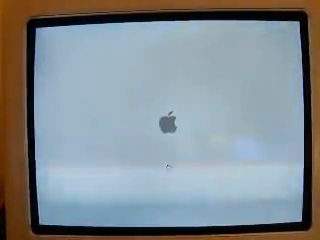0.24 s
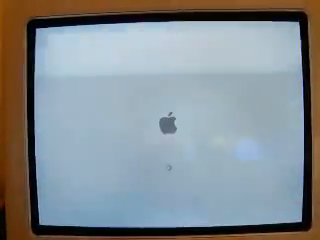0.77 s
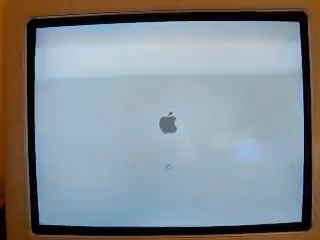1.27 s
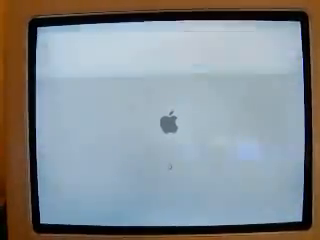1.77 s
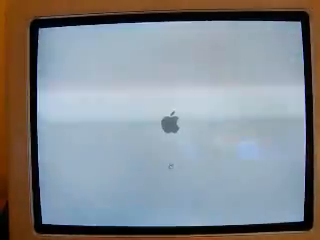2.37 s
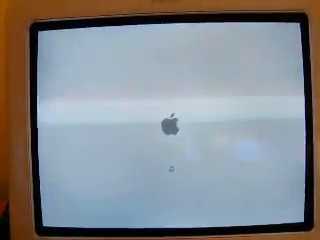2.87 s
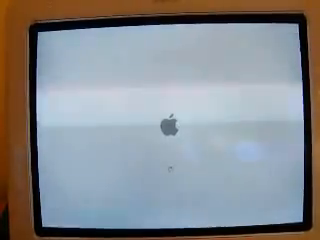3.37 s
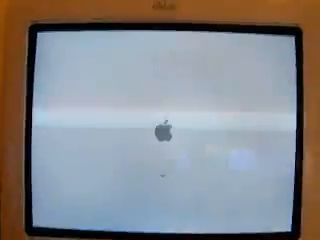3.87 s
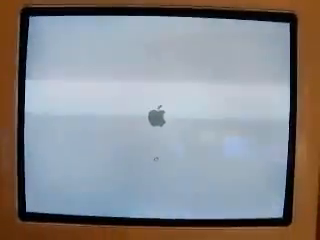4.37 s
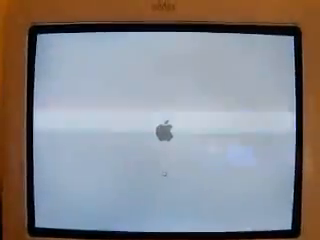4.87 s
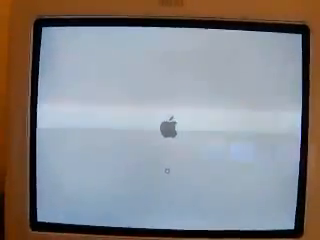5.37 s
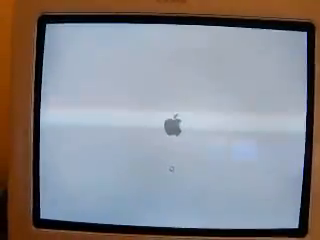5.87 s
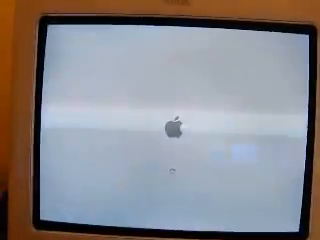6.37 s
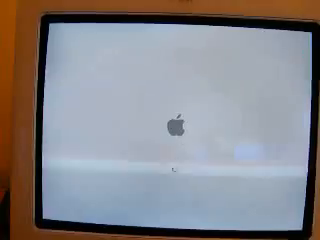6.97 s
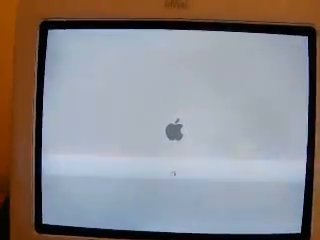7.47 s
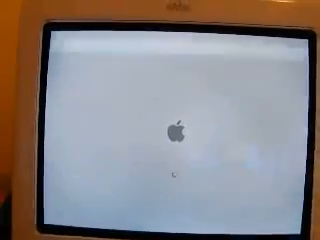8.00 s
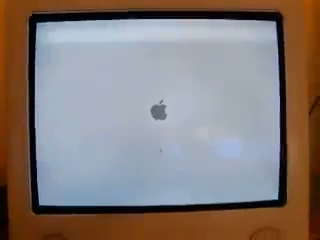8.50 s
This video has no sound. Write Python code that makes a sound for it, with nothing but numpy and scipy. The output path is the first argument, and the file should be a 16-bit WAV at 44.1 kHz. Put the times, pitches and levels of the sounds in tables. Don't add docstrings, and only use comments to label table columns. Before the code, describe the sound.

Close to an old bulky desktop computer in a quiet room, steady fan air and a low blade hum sit under a raspy, fluttering drive hiss and thin whine. A faint plastic click comes early. Around the middle the hand shifts on the microphone with ticks, bumps and one hard knock, then a loud click. The machine idles on unchanged.

```python
import sys
import numpy as np
from scipy import signal
from scipy.fft import rfft, irfft, next_fast_len
from scipy.io import wavfile
from scipy.ndimage import uniform_filter1d

SR = 44100
rng = np.random.default_rng(int(sys.argv[2]) if len(sys.argv) > 2 else 0)


def store_pcm(level_fs):
    pcm = np.round(np.clip(level_fs, -1, 1) * 32767).astype(np.int16)
    wavfile.write(sys.argv[1], SR, np.atleast_2d(pcm).T)


def ratio(d):
    e = np.asarray(d, float) / 20
    return 10 ** e


N = 385434

# (frequency [Hz], density [dB per Hz])
HISS_SPECTRUM = [(200, -21.5), (500, -4), (1000, -2), (2000, -1.5), (3000, -12.5), (4000, -8),
                 (5000, -12.5), (6000, -23), (7000, -25.5), (7700, -51), (9000, -74)]
# (frequency [Hz], width [Hz], gain [dB])
CASE_MODES = [(700, 102, 13.5), (783, 63, -20), (889.5, 48, 11.5), (1131, 42, -13.5), (1183, 68, 8.5),
              (1497, 74, -14.5), (1702, 61, -0.5), (1783, 55, 9.5), (1846, 65, 6.5), (2059, 143, -15.5),
              (2270, 222, 9.5), (2491, 178, 13.5), (2720, 308, -21), (3560, 870, 15.5), (3807, 328, 8.5),
              (4056, 202, -14.5), (4280, 120, 9), (4442, 200, 8.5), (4470, 44, 2.5), (3675, 34, 3),
              (5120, 37, -8), (6720, 240, 4.5), (6600, 60, -0.5), (6510, 180, 8.5)]
# (time [s], length [ms], rise [dB])
SPURTS = [(0.142, 82, 2), (0.736, 140, 3.5), (0.994, 180, 1.5), (1.331, 160, 0.7), (1.72, 97, 3),
          (1.888, 29, 2.5), (2.205, 230, 1.5), (2.528, 63, 2), (2.74, 190, 3), (3.464, 62, 2),
          (3.604, 210, 1), (3.811, 110, 2.5), (3.969, 190, 2), (4.206, 33, 2), (4.282, 51, 1),
          (4.372, 32, 3.5), (4.444, 150, 2.5), (4.683, 242, 3.5), (4.975, 170, 2.5), (5.723, 150, 3.5),
          (5.852, 22, -0.5), (6.433, 220, 1.2), (6.641, 330, 2), (7.048, 320, 1.4), (7.441, 150, 1.5),
          (7.565, 20, 2.5), (7.595, 279, 2.5), (7.836, 200, 0.2), (8.088, 230, 0.5), (8.389, 230, 2)]
# (time [s], length [ms], depth [dB])
GAPS = [(0.052, 67, -1.5), (0.184, 16, -5.5), (0.207, 15, -1.5), (0.28, 8, -2.5), (0.347, 10, -4),
        (0.393, 7, -3), (0.507, 8, 0), (0.715, 8.1, -6), (0.895, 8.3, -3.5), (0.95, 15, -5),
        (0.964, 10, -6), (0.999, 6.9, -2), (1.18, 8.1, -5.5), (1.203, 10, -2), (1.314, 12, -2),
        (1.483, 9, -3), (1.697, 10, -2.5), (1.83, 13, -2), (1.96, 8.6, -4), (2.004, 19, -0.5),
        (2.174, 24, -3), (2.317, 16, -4.5), (2.779, 16, -4), (2.9, 12, -4), (2.994, 22, -5.5),
        (3.223, 6.9, -4.5), (3.351, 6, -6), (3.756, 30, -2), (3.905, 37, -3), (3.95, 13, -7),
        (4.194, 17, -5.5), (4.248, 8.5, -7), (4.327, 39, -1), (4.415, 13, -3.5), (4.612, 14, -5),
        (4.883, 22, -2), (5.164, 54, -0.5), (5.232, 7.6, -1.5), (5.66, 7.5, -6), (5.905, 17, -2),
        (5.942, 10, -6.5), (6.053, 228, -1), (6.054, 27, -2.5), (6.166, 90, -4), (6.256, 26, -1.5),
        (6.2, 18, -1.5), (6.23, 22, -2), (6.41, 14, -6.5), (6.505, 10, -5.5), (6.559, 24, -4),
        (6.922, 10, -1), (7.022, 27, -0.5), (7.196, 28, -3.5), (7.386, 9, -5), (7.752, 4.6, -2),
        (8.05, 21, -2.5), (8.298, 11, -2), (8.318, 7.2, -8.5), (8.358, 5.7, -4.5), (8.678, 16, -2.5),
        (0.016, 7.6, -2), (0.113, 6.5, -5.5), (1.258, 4.1, -4), (1.558, 7.1, -5), (1.855, 3.6, -2),
         (2.111, 10.0, -0.5), (2.192, 6.0, -8), (2.242, 5.4, -1), (2.383, 5.0, -6), (2.478, 7.3, -5.5),
         (2.616, 6.4, -5), (2.704, 6.0, -0.5), (2.715, 8.0, -4.5), (2.969, 7.0, -4.5), (3.124, 2.7, 0),
         (3.135, 11, -3), (3.4, 5.5, -1.5), (3.855, 6.0, -4), (4.012, 9.8, -4), (4.118, 6.0, -1.5),
         (4.269, 6.5, -5.5), (4.349, 1.0, -3.5), (4.775, 6.5, -1), (5.018, 12.0, -2.3), (5.094, 3.2, -6),
         (5.174, 7.9, -4), (5.2, 6.0, -5.5), (5.311, 10.0, -3.5), (5.349, 4.0, 0), (5.748, 8.0, -2.5),
         (5.883, 6.0, -3.5), (6.084, 4.0, 0.5), (6.369, 11.0, -0.5), (6.685, 6.0, -3), (7.131, 6.0, -4),
         (7.414, 6.7, 0), (7.509, 3.6, 0), (7.722, 5.0, -4.5), (7.814, 10.0, -3), (7.885, 8.5, -4.5),
         (7.982, 6.4, -4), (8.07, 4.0, -2.5), (8.232, 23, 0), (8.381, 4.5, -4), (8.56, 17.0, -0.5)]
# (time [s], length [ms], rise [dB])
CATCHES = [(0.172, 10, 0.5), (0.226, 15, 2.5), (0.459, 26, 2.5), (0.786, 5.3, 4.5), (0.905, 7.3, 5),
           (0.977, 8.4, 1), (1.061, 20.0, 3.5), (1.191, 10.0, 1), (1.242, 8.5, 1), (1.339, 10, 1),
           (1.458, 16.0, 3.5), (1.517, 14.0, 3.5), (1.72, 8.0, 2.5), (2.251, 9.0, 4.5), (2.688, 7.1, 5),
           (2.738, 6.9, 6.5), (2.933, 13, 1), (2.978, 10.0, 2.5), (3.022, 5.6, -1), (3.069, 15.0, 0.5),
           (3.09, 11.0, 1.5), (3.476, 12, 1.5), (3.733, 7.6, 2.3), (3.811, 8.0, 2.3), (3.839, 14, 3.5),
           (3.968, 11.0, -0.5), (4.03, 14, -1.5), (4.158, 20, -2.5), (4.22, 15, 3), (4.239, 1.0, 4),
           (4.299, 7.7, 4.5), (4.369, 27, 0.5), (4.498, 7.2, 1), (4.549, 15, 1), (4.686, 20.0, 3),
           (4.869, 5.9, 1), (4.92, 21.0, 1.5), (5.034, 9.0, 2.7), (5.796, 14, -3.5), (5.853, 19.0, 3),
           (6.19, 9.0, 5), (6.221, 7.6, 0), (6.285, 14.0, 2.6), (6.431, 13, 3.5), (6.462, 8.2, 3.5),
           (6.545, 7.2, 2.5), (6.878, 11.0, 3.5), (6.985, 19.0, -0.5), (7.169, 10, 1.5), (7.223, 20, 3.5),
           (7.525, 10.0, 2), (7.565, 9.0, 2.5), (7.835, 22, 3.5), (7.962, 13.0, 4), (8.019, 16, 2.5),
           (8.105, 11, 4), (8.333, 13.0, 1), (8.539, 17, 3.1)]
# (frequency [Hz], level [dB rms])
TONES = [(212.4, -40), (237.3, -47), (335.9, -47), (425.3, -58), (679.0, -57), (839.2, -60), (942.1, -62),
         (1559.6, -65), (1752.3, -61), (1903.0, -64), (2182.3, -68), (2271.4, -57), (2370.1, -58),
         (2433.9, -63), (2468.9, -63), (2931.2, -70), (3005.9, -65), (3126.7, -66), (3229.4, -64),
         (3495.1, -59), (3593.8, -54), (3731.9, -54), (3786.5, -56), (3830.9, -55), (3936.5, -63),
         (4018.6, -69), (4199.1, -60), (4305.4, -57), (4404.0, -53), (4906.9, -72), (5009.8, -72),
         (5160.6, -72), (5262.8, -76), (5760.8, -80), (5863.8, -78), (6013.8, -80), (6619.9, -73),
         (6718.6, -78), (6824.7, -84)]
# (frequency [Hz], density [dB per Hz])
AIR_SPECTRUM = [(20, -20.5), (60, -19.5), (100, -9), (250, 1.5), (500, -2), (1000, -14.5), (1600, -12),
                (2100, -21), (2900, -14.5), (3600, -20), (5000, -24), (6000, -28.5), (6800, -50),
                (7700, -74.5)]
# (frequency [Hz], width [Hz], gain [dB])
ROOM_MODES = [(127.2, 10, 10.5), (150.6, 19, -9), (193.7, 24, 8.5), (229, 13, 1.5), (315, 85, 7),
              (382, 51, -6), (396.5, 43, 6.5), (439, 16, -2), (467, 45, -2)]
# (time [s], length [ms], change [dB])
DRAUGHTS = [
    (0.9, 600, -1),
    (2.15, 440, -1),
    (3.15, 280, -0.5),
    (4.65, 600, 1),
    (5.55, 350, -1),
    (5.84, 70, 2.5),
    (6.4, 650, 0.5),
    (7.55, 140, -1),
    (7.78, 210, 1),
    (8.25, 460, 0.5),
]
# (time [s], level [dB])
GRIP = [(0, -54), (3.72, -57), (4.04, -42), (4.23, -46.5), (4.4, -44), (5.2, -53.5), (7.9, -57),
        (8.15, -45), (8.74, -51)]
# (time [s], peak [dB], frequency [Hz], t60 [s])
BUMPS = [(0.3, -37, 84, 0.16), (1.47, -40, 85, .15), (1.88, -33, 77, 0.14), (2.64, -37, 75, .2),
         (3.79, -34, 42, 0.39), (3.847, -23.5, 91, 0.088), (4.033, -12.5, -300, 0.028),
         (4.0358, -24, 1020, 0.025), (4.034, -25, 680, 0.015), (4.034, -19, 35, 0.44),
         (4.049, -21, -70, 0.073), (4.0605, -21, 270, .03), (4.064, -19, 60, .05), (4.088, -30, 1150, .015),
         (4.087, -26, 698, 0.014), (4.108, -23, -54.5, 0.09), (4.1701, -16, 3150, 0.009),
         (4.1726, -23, -330, 0.006), (4.172, -10, -87, 0.018), (4.1746, -13, -560, 0.005)]
# (time [s], peak [dB], rise and fall [ms])
KNOCK = [
    (4.1702, -0.2, 0.7),
    (4.1697, -20, 1.8),
    (4.1714, -16, 0.45),
]
# (time [s], peak [dB], tilt [dB per octave], ring share [of t60])
CLICKS = [
    (2.253, -32, 7, 0.48),
    (4.034, -23, 13, .4),
    (4.62854, -6, -0.5, 0.95),
]
# (frequency [Hz], level [dB], t60 [s])
SHELL_MODES = [(255, -3.5, 0.022), (596, -9.5, 0.057), (734, -6, 0.03), (1320, 8, 0.0046),
               (2110, -3.5, 0.017), (2850, -12, 0.0056), (3280, 1, 0.0063), (3670, -1.5, 0.013),
               (4020, 3.5, 0.008), (4320, -18, .008), (5030, -13, 0.014), (5900, -19, 0.017)]
# (time [s], peak [dB], frequency [Hz], t60 [s])
TICKS = [
    (3.9437, -16, 4350, .005),
    (3.9437, -23, 5500, .004),
    (3.9448, -24, 4700, .005),
    (3.9461, -25, 4500, .004),
    (4.0335, -27, 5600, .007),
    (4.0352, -25, 4400, .007),
    (4.0366, -30, 6200, .006),
]
# (time [s], length [ms], level [dB])
RUSTLES = [
    (3.93, 40, -58),
    (6.05, 110, -54.5),
    (6.17, 120, -60),
]
# (low [Hz], high [Hz])
RUSTLE_BAND_HZ = [5200, 5500]
# (frequency [Hz], width [Hz], gain [dB])
PORT_MODES = [(4850, 110, -4), (6170, 130, -6), (6370, 110, -3), (6980, 330, -17), (7280, 300, 11)]

HISS_DB, AIR_DB, BOOM_DB = -35, -35.5, -42.7
BITE_MS = 37
GAP_DEEPENS = 1.55
AIR_SLIPS = 0.05
BOOM_SWELL_DB, TREMOR_SWING_DB = 0.4, 3
TONE_GAIN_DB = 3
SKIN_CUT_HZ = 5800
CONVERTER_CUT_HZ = 8100
OFFSET = -0.004


def rms_one(x):
    return x / np.sqrt(np.mean(x ** 2) + 1e-20)


def drift(rate_hz):
    r = np.exp(-2 * np.pi * rate_hz / SR)
    noise = rng.standard_normal(N + SR)
    return rms_one(signal.lfilter([1], [1, -2 * r, r * r], noise)[SR:])


def steps(rows, edge_ms):
    out = np.zeros(N)
    for s, ms, change in rows:
        out[int(s * SR):int((s + ms / 1000) * SR)] += change
    return uniform_filter1d(out, size=max(int(edge_ms * SR / 1000), 1))


def slope(x, spectrum):
    size = next_fast_len(N)
    bin_hz = np.maximum(np.arange(size // 2 + 1) * SR / size, 1)
    hz, db = np.transpose(spectrum)
    gain = ratio(np.interp(np.log(bin_hz), np.log(hz), db))
    return irfft(rfft(x, size) * gain, size)[:N]


def resonate(x, modes):
    hz, width_hz, db = np.transpose(modes)
    a = ratio(db / 2)
    c = -2 * np.cos(2 * np.pi * hz / SR)
    w = np.pi * width_hz / SR
    sos = np.stack([1 + w * a, c, 1 - w * a, 1 + w / a, c, 1 - w / a], axis=1)
    return signal.sosfilt(sos / sos[:, 3:4], x)


def add_blow(out, s, db, hz, t60):
    start = int(s * SR)
    t = np.arange(min(int(t60 * SR), N - start)) / SR
    out[start:start + len(t)] += ratio(db - 60 * t / t60) * np.sin(2 * np.pi * hz * t)


def bearing_contact(flutter_db, wobble_db):
    lost_db = GAP_DEEPENS * steps(GAPS, edge_ms=5)
    caught_db = steps(CATCHES, edge_ms=3)
    return ratio(lost_db + caught_db + flutter_db * drift(260) + wobble_db * drift(70))


def bearing(hiss_db, contact):
    friction = resonate(slope(rng.standard_normal(N), HISS_SPECTRUM), CASE_MODES)
    return ratio(hiss_db) * rms_one(friction) * contact


def tones(load):
    out = np.zeros(N)
    t = np.arange(N) / SR
    waver = drift(0.93)
    for (hz, db), turn in zip(TONES, rng.random(len(TONES))):
        level = ratio(TONE_GAIN_DB + db) * (load if hz > 600 else 1)
        out += level * np.sin(2 * np.pi * (hz * t + turn + waver * hz / 30000))
    return out


def fan(air_db, boom_db, contact):
    turbulence = rng.standard_normal(N) * ratio(1.5 * drift(20))
    air = resonate(slope(turbulence, AIR_SPECTRUM), ROOM_MODES)
    boom = signal.sosfiltfilt(signal.butter(3, 160, fs=SR, output="sos"), air)
    top = signal.sosfiltfilt(signal.butter(2, 900, "high", fs=SR, output="sos"), air)
    upper = air - boom + top * (contact ** AIR_SLIPS - 1)
    return ratio(air_db) * rms_one(upper) + ratio(boom_db) * rms_one(boom)


def hand():
    t = np.arange(N) / SR
    band = signal.butter(2, [18, 60], "band", fs=SR, output="sos")
    tremor = rms_one(signal.sosfilt(band, rng.standard_normal(N)))
    grip_s, grip_db = np.transpose(GRIP)
    out = ratio(np.interp(t, grip_s, grip_db) - 1 + TREMOR_SWING_DB * drift(2.5)) * tremor
    for bump in BUMPS:
        add_blow(out, *bump)
    for s, db, ms in KNOCK:
        distance = np.abs(t - s) / (ms / 1000)
        out += ratio(db) * np.maximum(1 - distance, 0) ** 1.25
    return out


def clicks():
    out = np.zeros(N)
    for s, peak_db, tilt_db, share in CLICKS:
        for hz, db, t60 in SHELL_MODES:
            level_db = peak_db + db - 9.5 + tilt_db * np.log2(hz / 4000)
            ring_s = t60 * share
            add_blow(out, s - 0.0002, level_db - 5, hz, ring_s)
            add_blow(out, s, level_db, -hz, ring_s)
            add_blow(out, s + 0.00124, level_db - 0.5 - hz / 300, hz, ring_s)
    for tick in TICKS:
        add_blow(out, *tick)
    return out


def rustle():
    band = signal.butter(2, RUSTLE_BAND_HZ, "band", fs=SR, output="sos")
    rub = rms_one(signal.sosfilt(band, rng.standard_normal(N)))
    return rub * steps([(s, ms, ratio(db)) for s, ms, db in RUSTLES], edge_ms=15)


def scene():
    load_db = steps(SPURTS, BITE_MS)
    contact = bearing_contact(flutter_db=1.5, wobble_db=0.8)
    drive = bearing(HISS_DB + load_db, contact)
    drive += tones(contact * ratio(load_db - np.mean(load_db)))
    air_db = AIR_DB + load_db + steps(DRAUGHTS, edge_ms=130)
    boom_db = BOOM_DB + BOOM_SWELL_DB * drift(2.7)
    air = fan(air_db, boom_db, contact / np.mean(contact))
    skin = signal.butter(6, SKIN_CUT_HZ, fs=SR, output="sos")
    touch = signal.sosfilt(skin, hand() + clicks())
    return np.tile(drive + air + touch + rustle(), (2, 1))


def band_limit(x):
    return signal.sosfilt(signal.butter(12, 16000, fs=SR, output="sos"), x)


def record(dry):
    converter = signal.cheby2(14, 60, CONVERTER_CUT_HZ, fs=SR, output="sos")
    narrow = signal.sosfilt(converter, resonate(dry, PORT_MODES))
    return band_limit(np.clip(narrow + OFFSET, -1, 1))


dry = scene()
out = record(dry)
store_pcm(out)
```